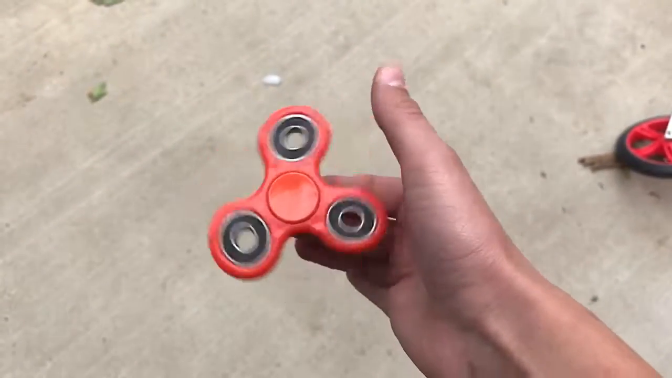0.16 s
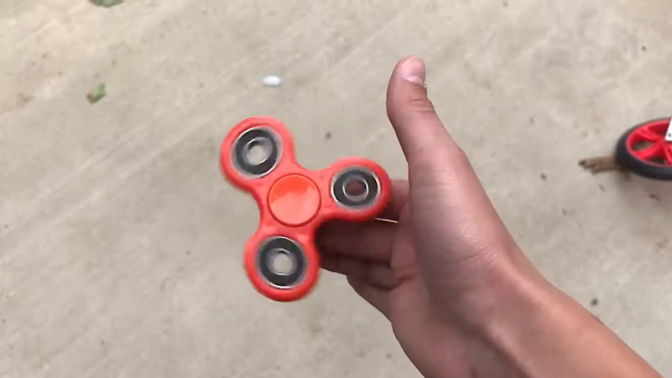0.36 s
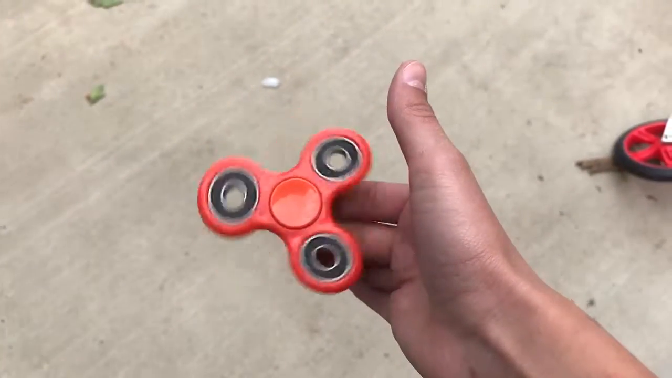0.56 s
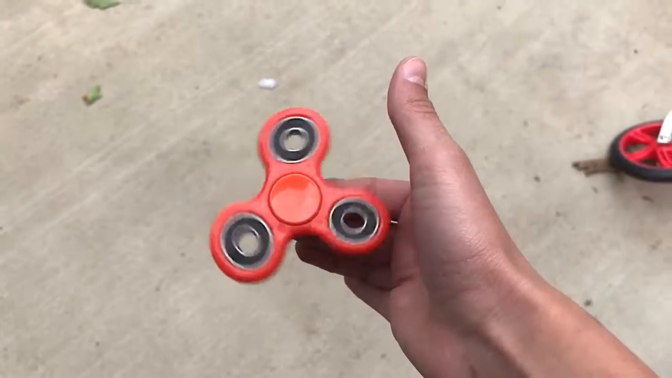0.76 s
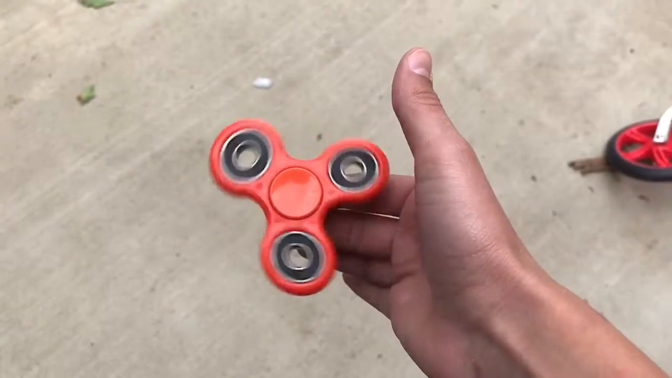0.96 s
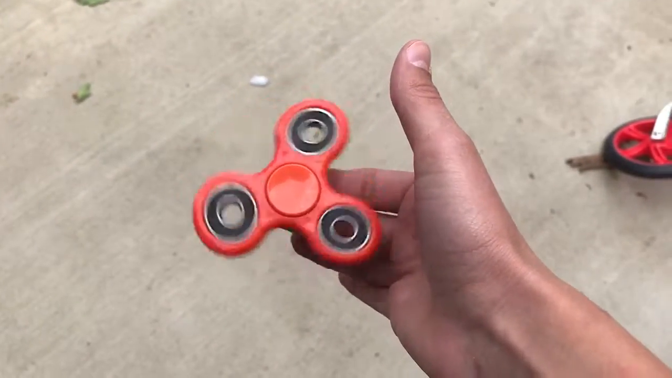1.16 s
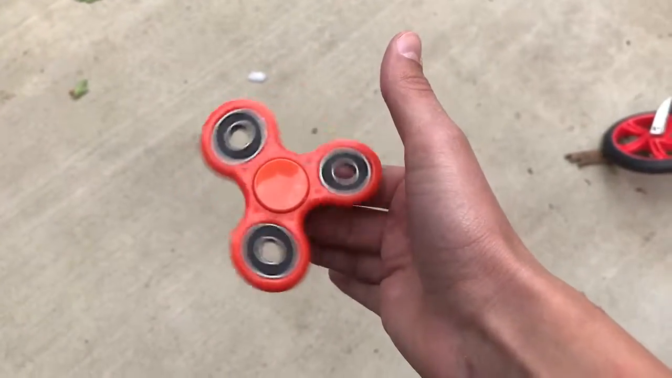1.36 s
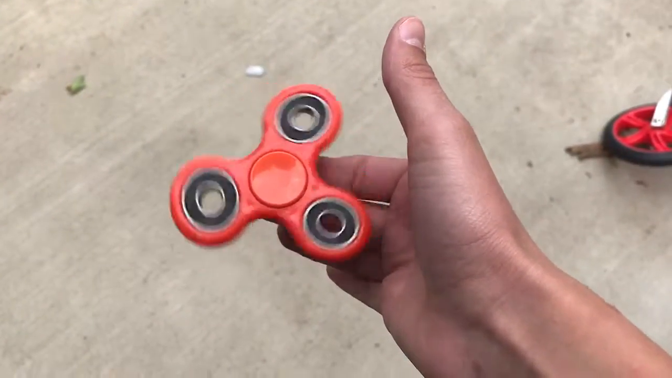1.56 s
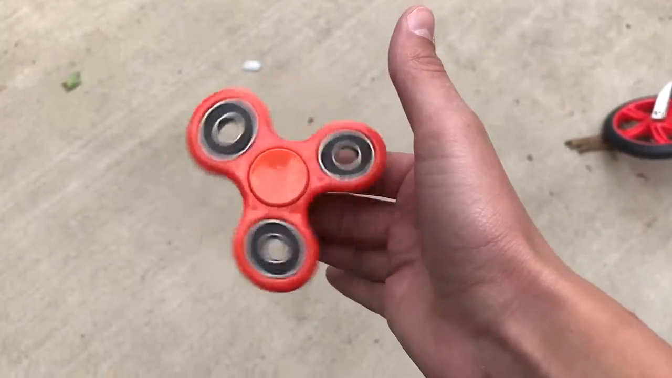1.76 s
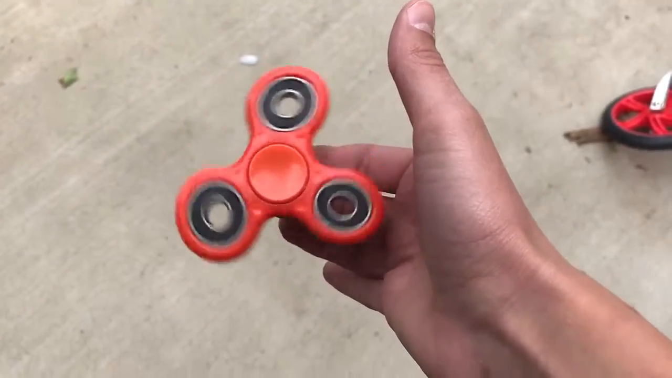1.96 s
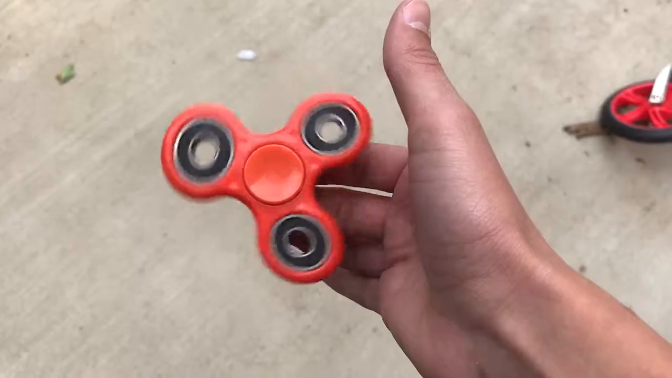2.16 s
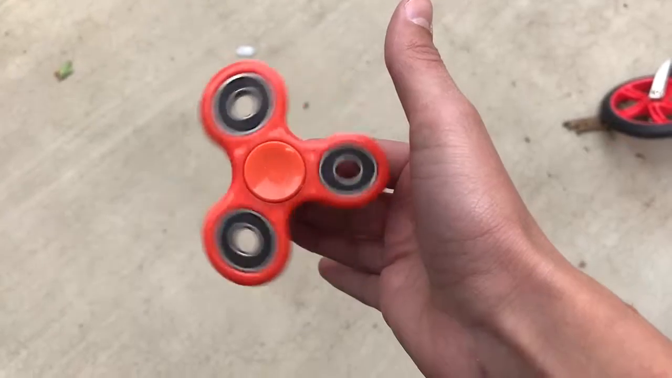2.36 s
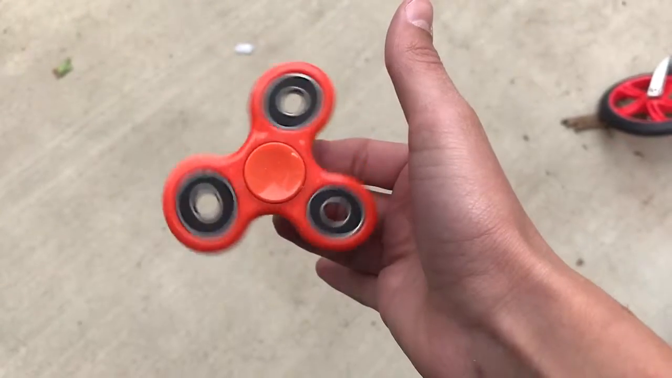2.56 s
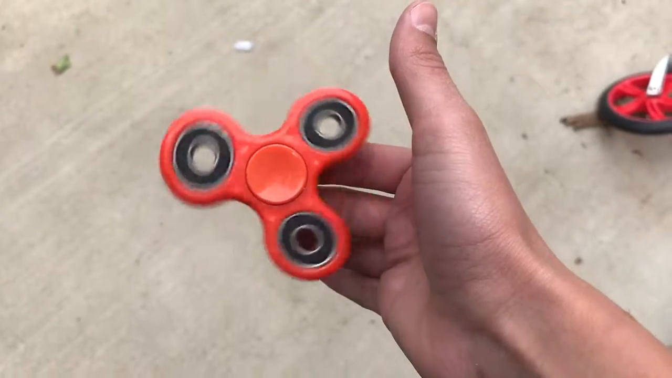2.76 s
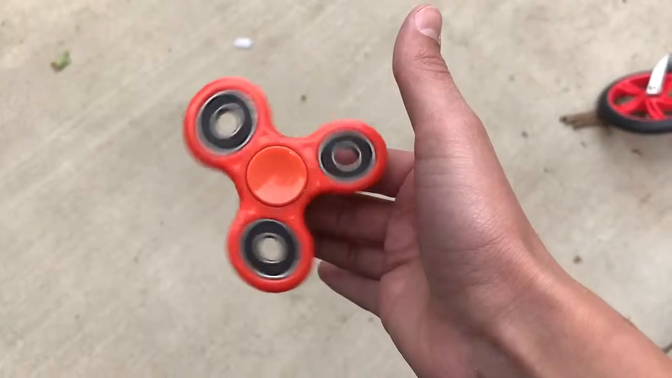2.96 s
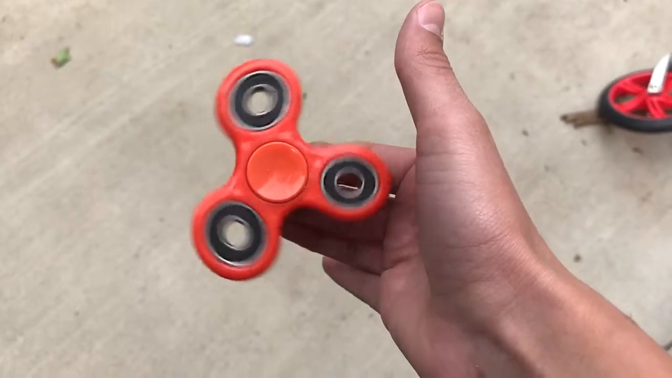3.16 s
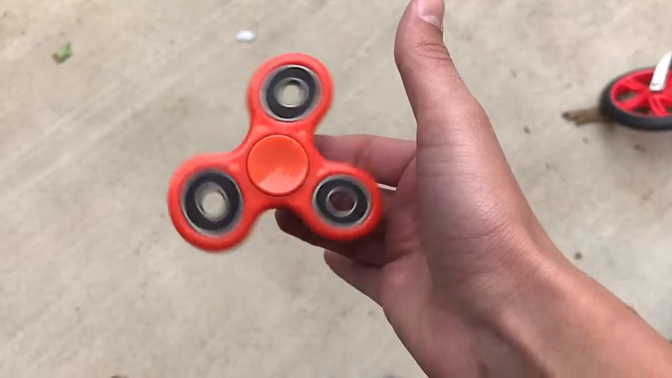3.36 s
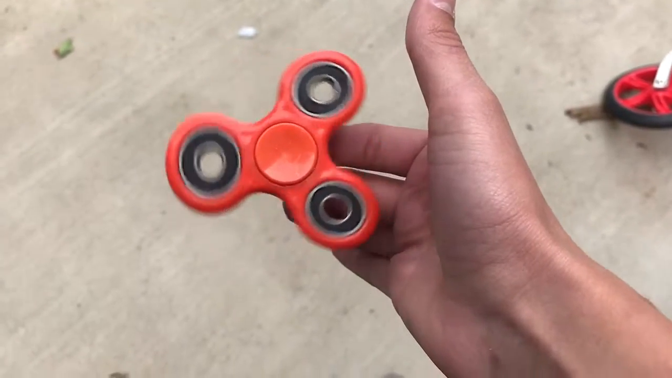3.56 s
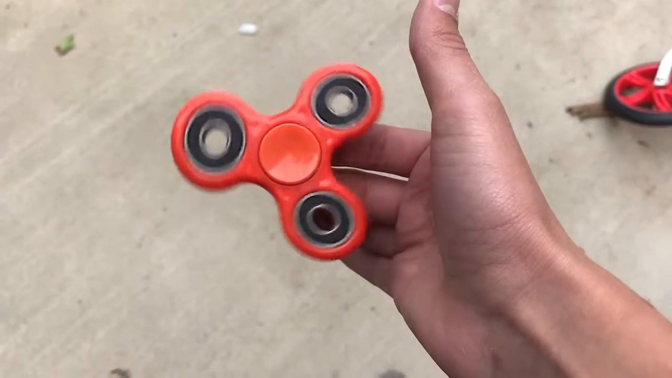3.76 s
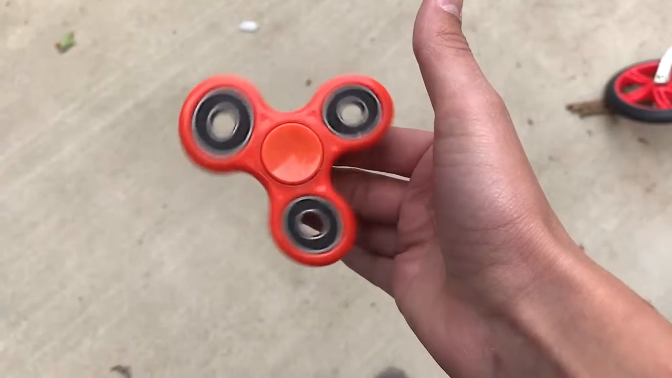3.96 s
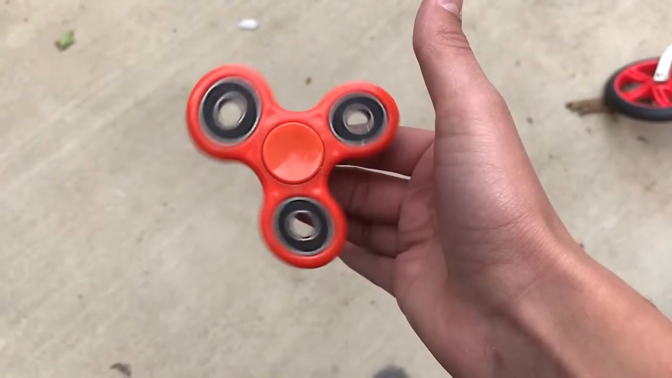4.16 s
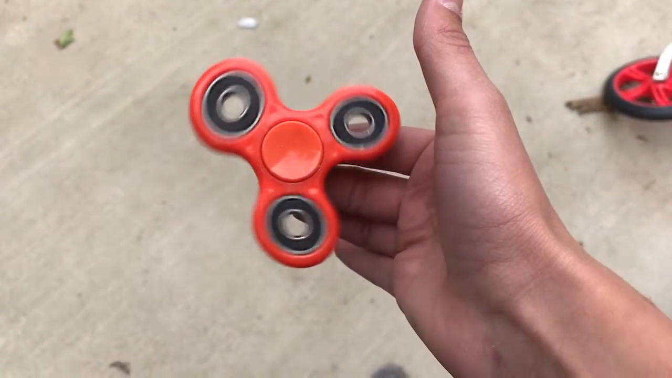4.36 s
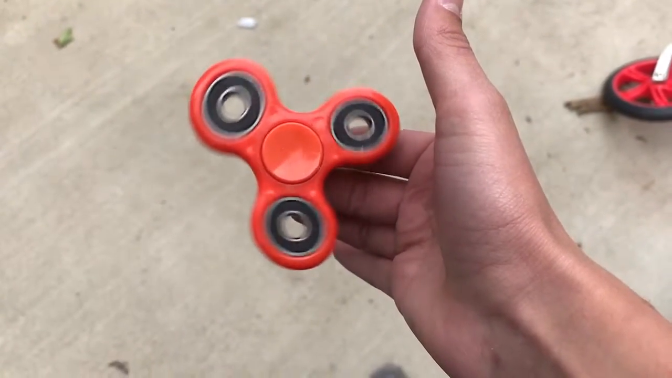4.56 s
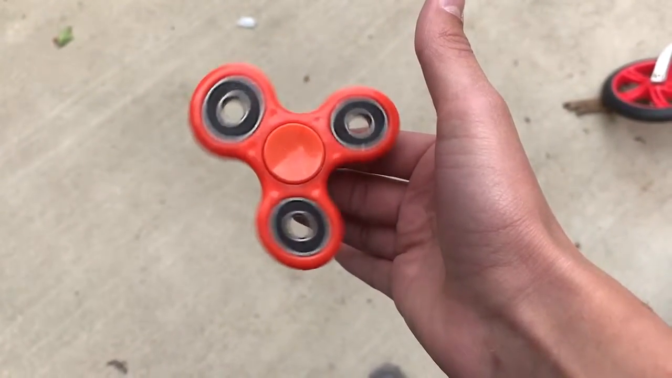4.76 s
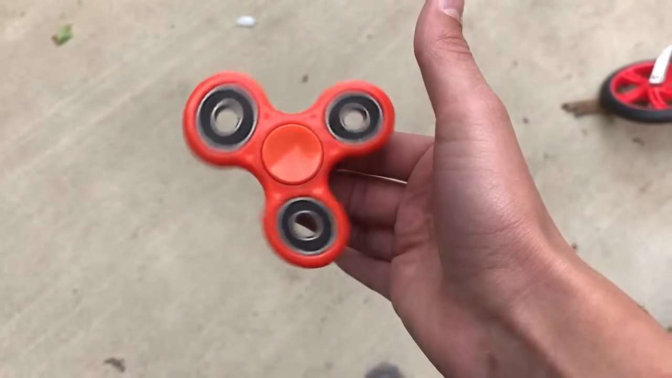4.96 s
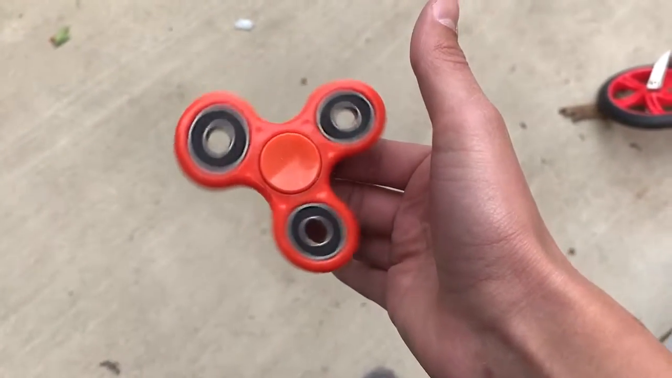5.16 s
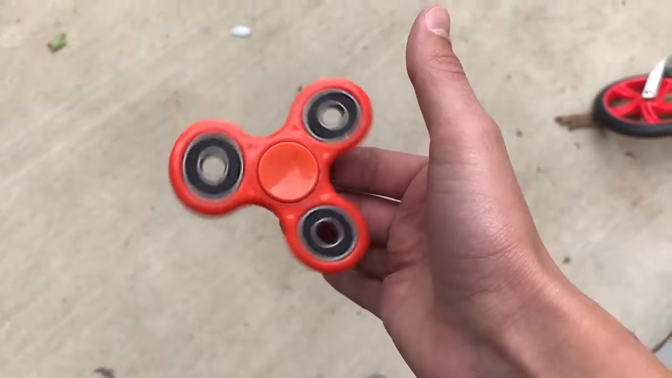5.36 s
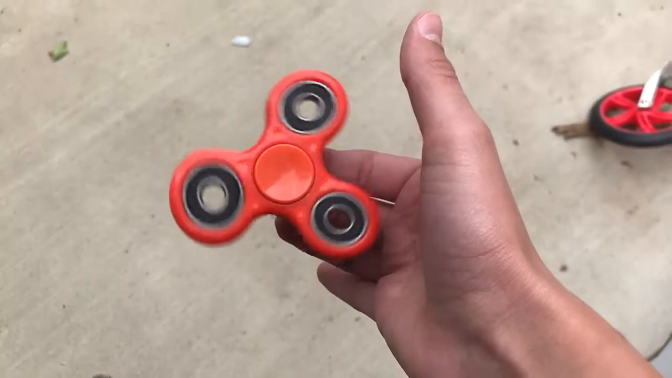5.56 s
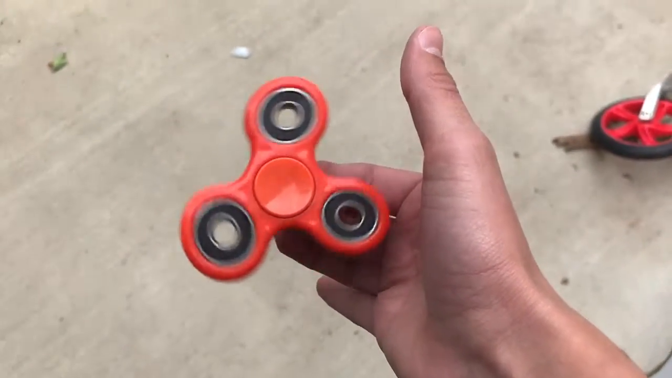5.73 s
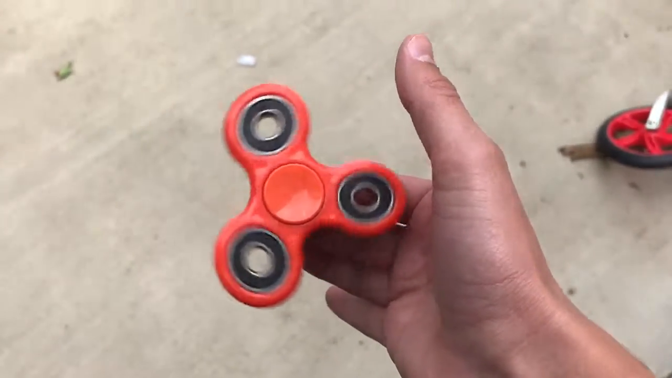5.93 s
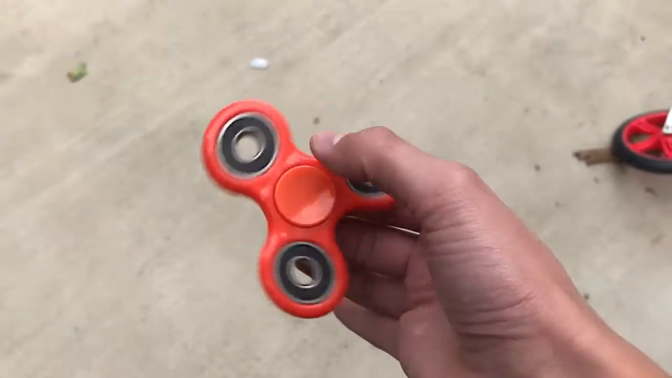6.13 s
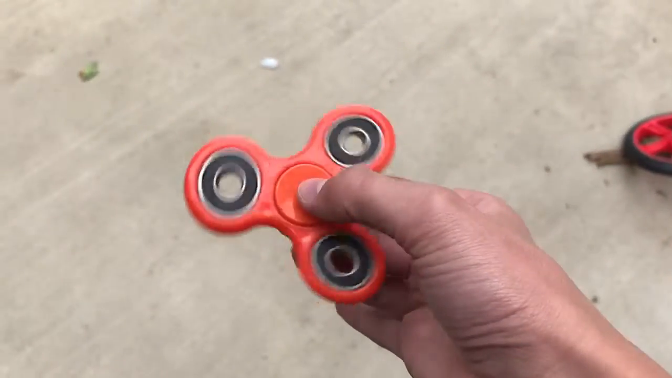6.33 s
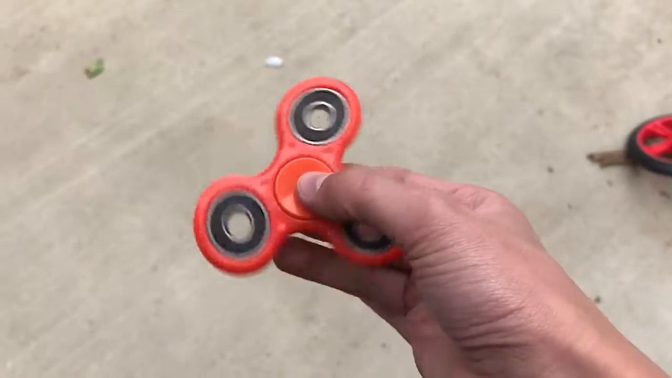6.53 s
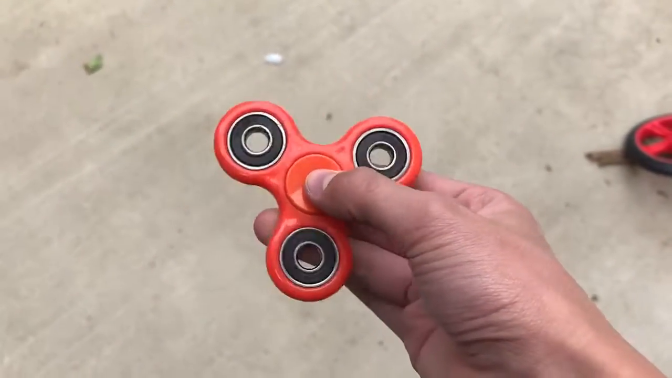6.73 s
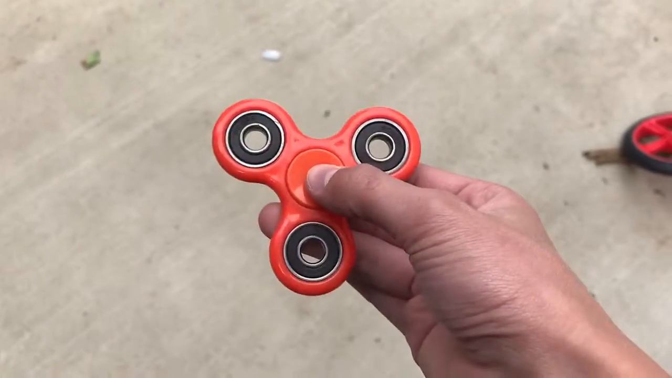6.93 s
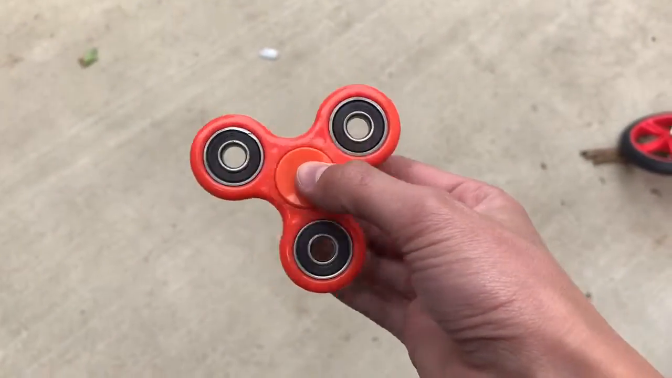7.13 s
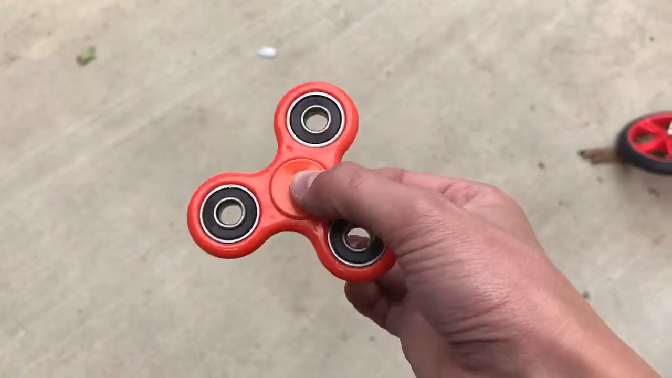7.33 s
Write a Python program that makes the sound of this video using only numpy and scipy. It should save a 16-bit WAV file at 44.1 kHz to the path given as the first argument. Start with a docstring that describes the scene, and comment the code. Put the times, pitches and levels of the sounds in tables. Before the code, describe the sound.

Close-up hissy rattle of a coasting hand spinner, fluttering rapidly with small clicks, then a dull echoing knock, a quick stop, and faint ticks outdoors.

```python
"""Outdoors over concrete: a plastic fidget spinner coasts on a fingertip close to a phone's microphone.
Dry balls, as noisy contacts, rattle round the centre bearing and ring its steel race (filtered resonances).
Weight bearings in the three arms jingle and tick as the hand moves; fingers bump, scuff and tick the plastic.
A dull knock echoes nearby, a finger brakes the spinner, and it is turned slowly by hand.
Behind it lie a wash of far sounds and a faint low rumble, both of filtered noise."""
import sys
import numpy as np
from scipy import signal
from scipy.fft import rfft, irfft
from scipy.io import wavfile
from scipy.ndimage import uniform_filter1d, map_coordinates

SR = 44100
rng = np.random.default_rng(int(sys.argv[2]) if len(sys.argv) > 2 else 0)


def transcribe(signal):
    """Save signal, clipped to [-1, 1], as a 16-bit WAV file at the path in sys.argv[1]."""
    frames = np.atleast_2d(signal).T
    limited = np.clip(frames, -1, 1)
    pcm = np.round(limited * 32767).astype(np.int16)
    wavfile.write(sys.argv[1], SR, pcm)


N = 325899
T = np.arange(N) / SR
FREQ = np.maximum(np.fft.rfftfreq(N * 2, 1 / SR), 1)


def amp(db):
    """Decibels to gain."""
    return 10 ** (np.asarray(db) / 20)


def unit(x):
    """Scale to rms 1."""
    return x / np.sqrt(np.mean(x ** 2))


def peak(x, db):
    """Scale to a peak level in dB."""
    return x * amp(db) / np.abs(x).max()


def curve(rows):
    """A (t/s, value) table joined by straight lines."""
    return np.interp(T, *np.transpose(rows))


def hump(s, half_s):
    """A smooth rise and fall that reaches 1 at time s."""
    return np.exp(-((T - s) / half_s) ** 2)


def spectrum(points):
    """(f/Hz, value) points joined on a log-frequency axis."""
    hz, value = np.transpose(points)
    return np.interp(np.log(FREQ), np.log(hz), value)


def colour(x, db):
    """Causal minimum-phase filter with the given gain in dB at every frequency."""
    cepstrum = irfft(db * np.log(10) / 20)
    # fold the cepstrum onto positive times
    cepstrum[1:N] *= 2
    cepstrum[N + 1:] = 0
    response = np.exp(rfft(cepstrum))
    return irfft(rfft(x, 2 * N) * response)[:N]


def ring(x, hz, width):
    """One resonance, gain 1 at its centre."""
    return signal.lfilter(*signal.iirpeak(hz, hz / width, fs=SR), x)


def band(x, lo, hi):
    """Band-pass from lo to hi in Hz."""
    sos = signal.butter(3, [lo, min(hi, .45 * SR)], "band", fs=SR, output="sos")
    return signal.sosfilt(sos, x)


def walk(rate):
    """Smooth random drift of rms 1, with about rate new values a second."""
    size = int(SR / rate)
    steps = np.repeat(rng.standard_normal(N // size + 1), size)
    smooth = uniform_filter1d(uniform_filter1d(steps, size), size)
    return unit(smooth[:N])


def add(out, s, sound):
    """Mix a sound in at time s."""
    start = int(s * SR)
    out[start:start + len(sound)] += sound[:N - start]


def decay(t, t60):
    """Exponential fall by 60 dB in t60 seconds."""
    return np.exp(-np.log(1000) * t / t60)


def impacts(rate, spread_db, size):
    """Random contacts, on average rate a second, whose strengths scatter by spread_db."""
    strike = rng.random(size) < rate / SR
    return strike * amp(spread_db * np.clip(rng.standard_normal(size), -3, 2.3))


def burst(t60):
    """The rough push of a brief contact: noise dying away."""
    t = T[:SR // 5]
    return rng.standard_normal(len(t)) * decay(t, t60)


def flicker(x, lo, hi, depth_db, rate):
    """Let one band waver in level on its own."""
    sos = signal.butter(2, [lo, min(hi, .45 * SR)], "band", fs=SR, output="sos")
    part = signal.sosfiltfilt(sos, x)  # in phase with x
    return x + part * (amp(depth_db * (walk(rate) - depth_db / 20)) - 1)


def wander(x, share, rate):
    """Let the pitch drift up and down by an rms share, reading the sound early or late."""
    drift = walk(rate)
    shift = share * drift / np.std(np.diff(drift))
    return map_coordinates(x, [np.arange(N) + shift], order=5, mode="mirror")


# colour of the outdoor wash: (f/Hz, level/dB)
AIR_COLOUR = [(20, -29), (40, 4.5), (80, -0.5), (140, -3.5), (250, -11.5), (450, -18), (700, -22),
              (1200, -28), (2300, -34.5), (4400, -36.5), (5600, -35.5), (7800, -41.5), (9500, -38.5),
              (15800, -37.5)]
# swells of the low rumble: (crest t/s, rise level/dB, half length t/s)
RUMBLE_SWELLS = [(.52, 5, .15), (1.45, 4.5, .15), (4.248, 6, 0.28), (5.332, 12.5, 0.64), (6.68, 9.5, .24)]


def outdoors(air_db, rumble_db, waver_db):
    """Far off: a nearly steady wash, and a low resonant rumble that wavers and now and then swells."""
    air = unit(colour(rng.standard_normal(N), spectrum(AIR_COLOUR))) * amp(0.8 * walk(8))
    rumble = unit(ring(ring(rng.standard_normal(N), 78.7, 52.5), 78.7, 52.5))
    swells_db = sum(db * hump(s, half_s) for s, db, half_s in RUMBLE_SWELLS)
    return amp(air_db) * air + rumble * amp(rumble_db + swells_db + waver_db * walk(12))


KNOCK_S, ECHO_LAG_S = 6.5372, 0.00099
# colour laid over the knock's modes and echo: (f/Hz, level/dB)
KNOCK_COLOUR = [(100, -6.5), (230, -2), (480, -1.5), (680, 0), (900, -5), (1100, -4.5), (1350, -1),
                (1900, -5), (2200, -15), (2500, -11), (2850, -23), (3500, -20), (6000, -44)]
# decay of the echo: (f/Hz, t60 t/s)
ECHO_DECAY = [(250, 0.72), (600, 0.65), (1400, 0.28), (3000, 0.21)]
# what the knocked thing rings with, before the colour: (f/Hz, level/dB, t60 t/s)
KNOCKED_MODES = [(234, -52, 0.33), (355, -52.5, .35), (410, -52, .3), (473, -48.5, .28), (535, -49, .2),
                 (639, -47, 0.33), (690, -51, .42), (765, -48.5, 0.27), (963, -47.5, 0.15),
                 (1117, -48, .18), (1260, -46, .16), (1320, -40, .1), (1500, -53, 0.088), (1900, -45.5, .1),
                 (2470, -42, .04)]
# first contacts, a sharp crack and two dull rebounds: (t/s, peak level/dB, centre f/Hz, width f/Hz)
KNOCK_CONTACTS = [(6.5368, -29.5, 1540, 380), (6.5442, -33.5, 540, 260), (6.5548, -38, 617, 300)]


def knock(echo_db):
    """Nearby, a hard blow rebounds and rings a few modes; dense reflections follow, whose lows last longest."""
    t, echo, modes = T[:SR], 0, 0
    decay_hz, decay_s = np.transpose(ECHO_DECAY)
    edges = 100 * 2 ** np.arange(0, 6.5, .5)  # half octaves
    for lo, hi in zip(edges, edges[1:]):
        t60 = np.interp(np.sqrt(lo * hi), decay_hz, decay_s)
        echo = echo + band(rng.standard_normal(SR), lo, hi) * decay(t, t60)
    for hz, db, t60 in KNOCKED_MODES:
        modes = modes + amp(db) * np.sin(2 * np.pi * (hz * t + rng.random())) * decay(t, t60)
    out = np.zeros(N)
    add(out, KNOCK_S, modes)
    # the earliest reflections are the strongest
    add(out, KNOCK_S + ECHO_LAG_S, amp(echo_db) * echo * (1 + .7 * np.exp(-t / .012)))
    out = colour(out, spectrum(KNOCK_COLOUR))
    tap = 1. * (t == 0)
    for s, db, hz, width in KNOCK_CONTACTS:
        add(out, s, peak(band(ring(tap, hz, width), hz / 2, 1.25 * hz), db))
    return out


# faint rounded blips, such as skin makes when it slips on plastic:
# (crest t/s, level/dB, pitch f/Hz, width f/Hz, half length t/s)
SKIN_BLIPS = [(3.761, -64, 1570, 40, 0.0081), (3.773, -57, 630, 170, 0.019), (4.185, -69, 2210, 35, .03),
              (6.82, -76.5, 1945, 40, .04)]


def blips():
    """Close by, narrow bands of noise swell and fade without a click."""
    out, t = np.zeros(N), T[:SR // 5]
    middle = t[-1] / 2
    for s, db, hz, width, half_s in SKIN_BLIPS:
        shape = np.exp(-((t - middle) / half_s) ** 2)
        tone = ring(ring(rng.standard_normal(len(t)), hz, width), hz, 4 * width) * shape
        add(out, s - middle, unit(tone) * np.sqrt(np.mean(shape ** 2)) * amp(db))
    return out


def rub(hz, width, t60):
    """A brief contact: a burst of noise in one band."""
    half = np.exp(width / hz / 2)
    return band(burst(t60), hz / half, hz * half)


# soft bumps of the hand on the phone: (t/s, peak level/dB)
HAND_BUMPS = [(.284, -48), (1.515, -39.5), (3.686, -46)]
BUMP_HZ, BUMP_WIDTH_HZ, BUMP_T60_S = 160, 132, 0.089
# light scuffs of the fingers, and two short bright ticks of the weights (6.972, 7.304):
# (t/s, peak level/dB, centre f/Hz, width f/Hz, t60 t/s)
SCUFFS_AND_WEIGHT_TICKS = [(2.135, -50.5, 1900, 1400, .02), (4.635, -43, 3500, 1700, .07),
                           (4.645, -39.5, 12000, 2500, .04), (4.652, -48, 2700, 1000, .08),
                           (6.755, -52, 6200, 3500, .005), (6.775, -67, 3800, 700, .3),
                           (6.972, -48, 9800, 5000, .004), (7.085, -55, 6940, 1000, .011),
                           (7.304, -47, 11000, 5000, .003)]
# dry ticks of plastic: (t/s, peak level/dB, brightness level/dB an octave, thud peak level/dB)
PLASTIC_TICKS = [(5.2132, -38.5, -6, -38), (5.6174, -41, 13, -43.5), (5.997, -46, 3, -45)]
# what the ticks ring with: (f/Hz, width f/Hz, level/dB before the brightness)
PLASTIC_MODES = [(1400, 300, 0), (2330, 330, -3), (3600, 650, -10)]
# the flesh behind the plastic answers with a small thud
THUD_HZ, THUD_WIDTH_HZ, THUD_LAG_S = 390, 320, .0008


def touches():
    """Close by, noise bursts for bumps, scuffs and two ticks of the weights; tapped modes for plastic ticks."""
    out = np.zeros(N)
    tap = 1. * (T[:SR // 20] == 0)
    for s, db in HAND_BUMPS:
        add(out, s, peak(rub(BUMP_HZ, BUMP_WIDTH_HZ, BUMP_T60_S), db))
    for s, db, hz, width, t60 in SCUFFS_AND_WEIGHT_TICKS:
        add(out, s, peak(rub(hz, width, t60), db))
    thud = band(ring(tap, THUD_HZ, THUD_WIDTH_HZ), 150, 940)
    for s, db, tilt_db, thud_db in PLASTIC_TICKS:
        snap = 0
        for hz, width, mode_db in PLASTIC_MODES:
            snap = snap + amp(mode_db + tilt_db * np.log2(hz)) * ring(tap, hz, width)
        add(out, s, peak(band(snap, 700, 4100), db))
        add(out, s + THUD_LAG_S, peak(thud, thud_db))
    return out


# ring of the weight bearings, before a small random change: (f/Hz, width f/Hz, level/dB)
WEIGHT_MODES = [(5800, 150, -17), (6620, 400, -7), (9164, 70, 2.5), (9550, 460, -2), (11440, 290, -1.5),
                (12480, 90, -8), (12800, 150, -8), (14720, 160, -2.5)]


def weights(hits, upper_db):
    """The steel weights ring, a little differently each time; upper_db lifts the modes above 10 kHz."""
    out = 0
    for hz, width, db in WEIGHT_MODES:
        mode = unit(ring(ring(hits, hz, width), hz, 6 * width))
        out = out + mode * amp(db + upper_db * (hz > 10000) + 1.4 * rng.standard_normal())
    return unit(out)


# the thumb closes on the cap, also heard in the centre bearing: (t/s, grip 0-1)
THUMB_GRIP = [(6.15, 0.1), (6.3, 0.6), (6.6, 0.9)]
# fast spin pins the balls in the weights; once it has slowed they shiver in fits, and barely under the thumb
LOOSE_S, LOOSEN_S = 3.3, .2
SHIVER_DB, SHIVER_REST_DB, SHIVER_FITS_DB, SHIVER_FITS_PER_S = -67, -78, 2.5, 20
# loose balls tumbling in the weights: (t/s, level/dB, length t/s, upper modes level/dB)
TUMBLES = [(3.113, -54, 0.028, -6), (3.523, -58, .012, -8), (3.585, -47.5, .012, 11),
           (3.714, -50, .015, 11), (3.894, -51.5, .022, 1), (4.046, -50.5, .023, -4),
           (4.183, -54, .015, 10), (4.571, -52, .025, -2), (4.75, -59, .02, -3), (5.369, -53, .015, 0),
           (5.975, -54, .02, -8), (5.997, -45.5, .01, 7), (6.04, -54, .012, 0), (6.177, -48, 0.038, 7),
           (6.448, -59, .015, 8), (6.856, -65.5, 0.015, -8), (6.913, -69, .015, -10),
           (6.933, -66, .025, -10), (6.972, -59, .06, -4), (7.12, -66, 0.017, -2), (7.14, -60.5, .04, 8),
           (7.197, -68, .018, -14), (7.229, -66, .018, -14), (7.296, -62.5, 0.022, -3),
           (7.327, -66, 0.043, 1)]


def jingles():
    """In the arms, loose balls shiver against the weights and tumble in short flurries of impacts."""
    loose = (1 + np.tanh((T - LOOSE_S) / LOOSEN_S)) / 2
    grip_ends = [THUMB_GRIP[0][1], THUMB_GRIP[-1][1]]
    shiver_db = np.interp(curve(THUMB_GRIP), grip_ends, [SHIVER_DB, SHIVER_REST_DB])
    shiver_db = shiver_db + SHIVER_FITS_DB * walk(SHIVER_FITS_PER_S)
    shiver_hits = impacts(rate=280, spread_db=5.0, size=N) * rng.standard_normal(N)
    out = weights(shiver_hits, upper_db=3.0) * loose * amp(shiver_db)
    t = T[:SR // 5]
    for s, db, length, upper_db in TUMBLES:
        hits = impacts(rate=1700, spread_db=0.5, size=len(t)) * rng.standard_normal(len(t))
        flurry = hits * np.exp(-(t / length) ** 2)
        # short flurries keep their level over their own length
        add(out, s, weights(flurry, upper_db) * amp(db) * np.sqrt(length / t[-1]))
    return out


# broad radiation of the plastic body: (f/Hz, level/dB)
BODY_COLOUR = [(200, -52.5), (700, -38.5), (1350, -39), (2400, -35.5), (3400, -32), (3650, -27.5),
               (4400, -27), (5000, -29), (5600, -22.5), (8300, -25.5), (8900, -32.5), (10600, -33.5),
               (13300, -32), (15800, -22.5)]
# resonances and dips of race and body: (f/Hz, width f/Hz, level/dB above the body,
# f/Hz under the thumb, level/dB under the thumb)
RACE_MODES = [(1053, 314, 14, 1100, 9), (1725, 410, 4.5, 1725, 5.5), (3850, 360, 3, 4440, 5.5),
              (6644, 762, 20, 6530, 19.5), (7274, 600, 16, 7210, 12.5), (8050, 540, -0.5, 7840, -6),
              (9550, 400, 11, 9580, 12), (11700, 140, 3.5, 11650, 3), (14900, 1400, 5, 12000, 4)]


def radiate(force, gripped):
    """Body and race resonances, either free or loaded by the thumb, at rms 1."""
    modes_db = 0
    for free_hz, width, free_db, grip_hz, grip_db in RACE_MODES:
        hz, db = (grip_hz, grip_db) if gripped else (free_hz, free_db)
        modes_db = modes_db + db / (1 + (2 * (FREQ - hz) / width) ** 2)
    return unit(colour(force, spectrum(BODY_COLOUR) + modes_db))


# the hardest single ball contacts, all alike: (t/s)
BALL_CLICKS = [.3272, 1.056, 1.347, 1.712, 1.7964, 2.109, 2.6168, 2.7082, 2.893, 3.192, 3.3428, 3.551,
               5.0892, 5.515, 5.675, 5.9173, 6.2423, 6.2863]
CLICK_DB, CLICK_T60_S = -28, .005  # peak level, decay


def clicks():
    """Now and then one ball strikes the race much harder and skids briefly, ringing its main modes."""
    force, out = np.zeros(N), np.zeros(N)
    for s in BALL_CLICKS:
        add(force, s, burst(CLICK_T60_S))
    strikes = band(radiate(force, False), 5600, 8500)
    for s in BALL_CLICKS:
        strike = strikes[int(s * SR):][:SR // 50]
        add(out, s + .0005, peak(strike, CLICK_DB))
    return out


# centre bearing while it coasts, before flares and brake: (t/s, rattle level/dB)
COAST = [(0, -40), (.6, -42), (1.8, -41), (2.8, -41.5), (3.1, -42), (4.7, -42), (6.1, -43.5), (6.42, -44.5),
         (6.6, -44.5)]
BRAKE_S, BRAKE_DB_PER_S = 6.63, 79  # the finger drags on the rim
STOP_S, STOP_FADE_S = 6.73, .008
CAGE_HZ, CAGE_DRAG = 8.24, .024  # turns a second of the ball cage at the start, share lost a second
# the rattle flares briefly, all alike: (t/s)
RATTLE_FLARES = [2.61, 2.869, 3.35, 3.635, 4.33, 5.3]
FLARE_DB, FLARE_S = 3, 0.017
RACE_WANDER, RACE_WANDER_PER_S = 0.0051, 30  # the race's pitch shifts with the load, as a share


def bearing():
    """Balls chatter against the race; rough spots come round with every turn of the slowing cage."""
    turns = np.cumsum(CAGE_HZ * np.exp(-CAGE_DRAG * T)) / SR
    orders = np.arange(1, 13)
    rough_spots = unit(sum(np.cos(2 * np.pi * (k * turns + rng.random())) for k in orders))
    load = amp(1.64 * rough_spots + 0.36 * walk(35))
    # each contact is a tiny scrape, so each has its own colour
    hits = impacts(rate=2400, spread_db=3.1, size=N)
    contact = signal.lfilter([1], [1, -np.exp(-1 / (0.00011 * SR))], hits)
    force = unit((unit(contact) + 0.82) * rng.standard_normal(N) * load)
    # low down the balls roll evenly; the single contacts stand out higher up
    rolling = 1 / (1 + (FREQ / 2600) ** 2)
    chatter = rfft(force, 2 * N) * np.sqrt(1 - rolling)
    even_roll = rfft(rng.standard_normal(2 * N)) * np.sqrt(rolling)
    force = irfft(chatter + even_roll)[:N]
    # the thumb loads the race, which then rings duller,
    # its main modes slightly lower and some lesser ones higher
    grip = np.clip(curve(THUMB_GRIP), 0, 1)
    rattle = (1 - grip) * radiate(force, False) + grip * radiate(force, True)
    # the resonances wander a little; the highest modes and those of the plastic flicker on their own
    rattle = wander(rattle, RACE_WANDER, RACE_WANDER_PER_S)
    rattle = flicker(rattle, 12500, 19000, depth_db=2.0, rate=70)
    rattle = flicker(rattle, 3520, 4770, depth_db=1.4, rate=25)
    # it coasts with a few flares, fades under the braking finger and stops
    flares_db = FLARE_DB * sum(hump(s, FLARE_S) for s in RATTLE_FLARES)
    brake_db = BRAKE_DB_PER_S * np.maximum(T - BRAKE_S, 0)
    stop = np.exp(-np.maximum(T - STOP_S, 0) / STOP_FADE_S)
    return rattle * amp(curve(COAST) + flares_db - brake_db) * stop


def scene():
    """Everything, from far to near, at one microphone."""
    background = outdoors(air_db=-57, rumble_db=-61, waver_db=1.5) + knock(echo_db=-31.5)
    spinner = blips() + touches() + jingles() + clicks() + bearing()
    return (background + spinner)[None]


def record(dry):
    """The phone cuts the deepest bass and the top."""
    low_cut = signal.butter(4, 32, "high", fs=SR, output="sos")
    top_cut = signal.ellip(10, .2, 70, 15740, fs=SR, output="sos")
    return signal.sosfilt(top_cut, signal.sosfilt(low_cut, dry))


dry = scene()
out = record(dry)
transcribe(out)
```